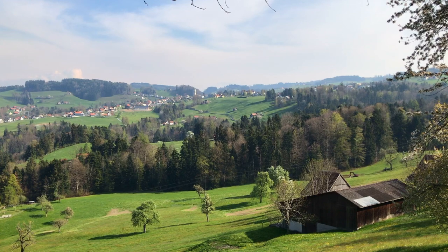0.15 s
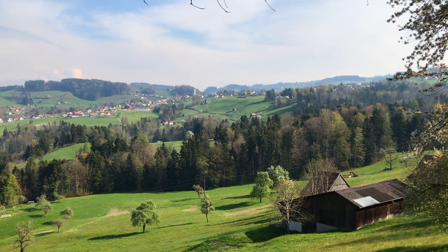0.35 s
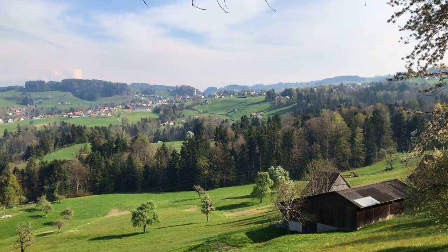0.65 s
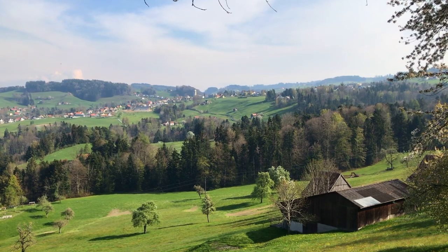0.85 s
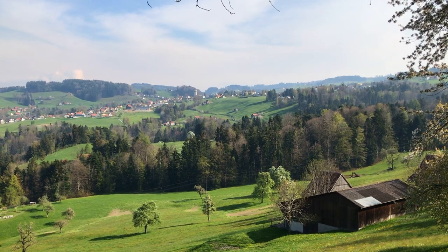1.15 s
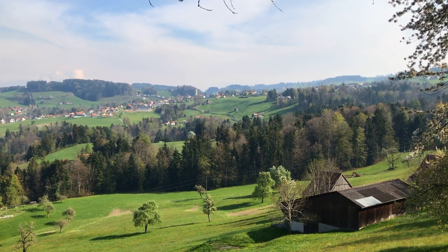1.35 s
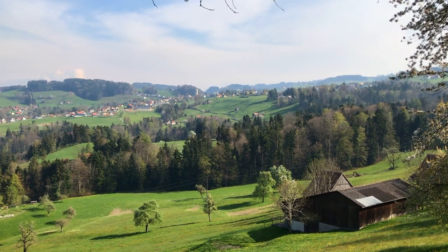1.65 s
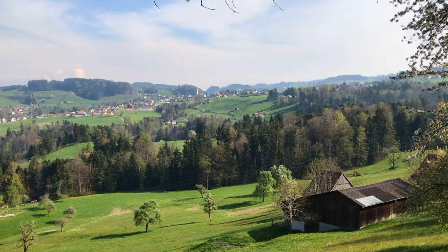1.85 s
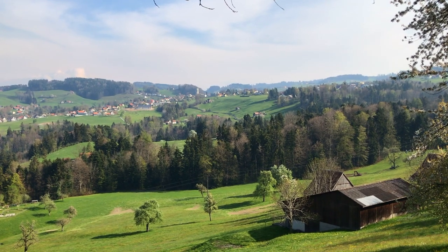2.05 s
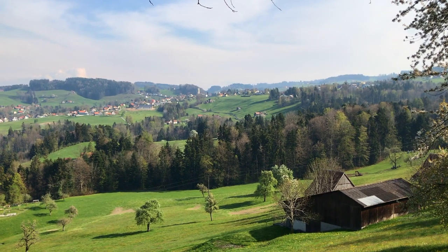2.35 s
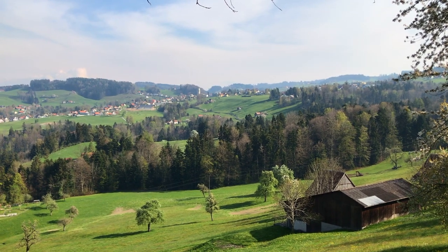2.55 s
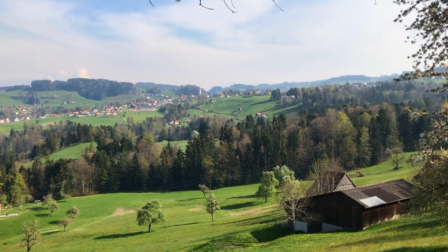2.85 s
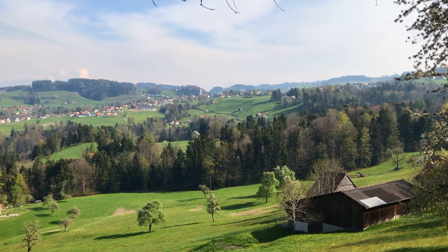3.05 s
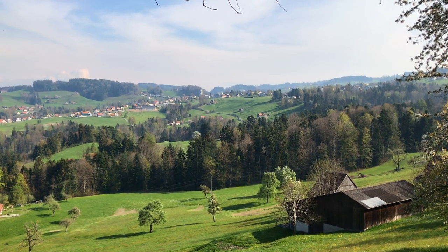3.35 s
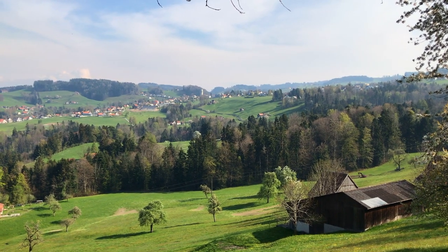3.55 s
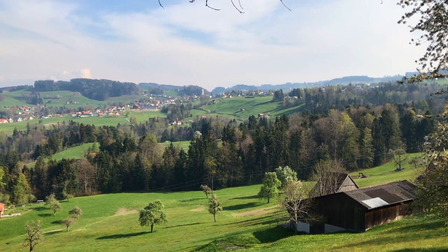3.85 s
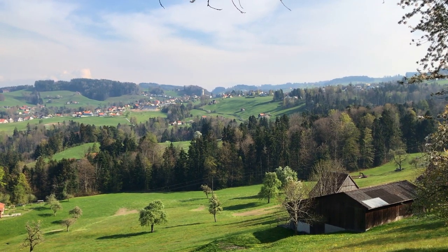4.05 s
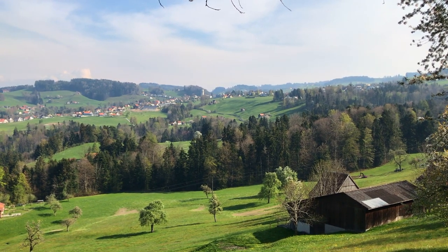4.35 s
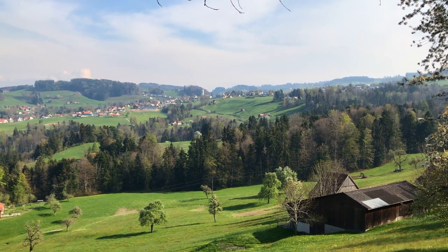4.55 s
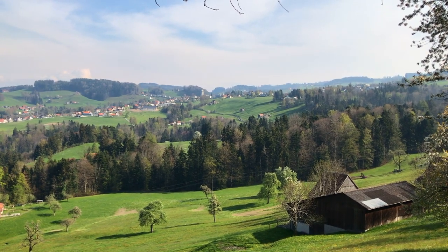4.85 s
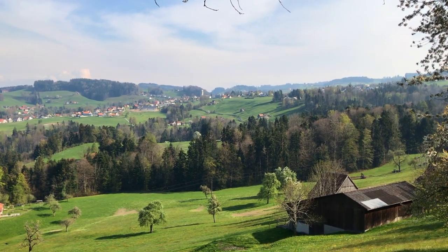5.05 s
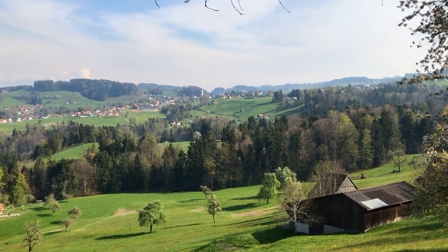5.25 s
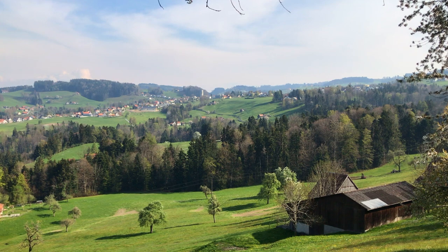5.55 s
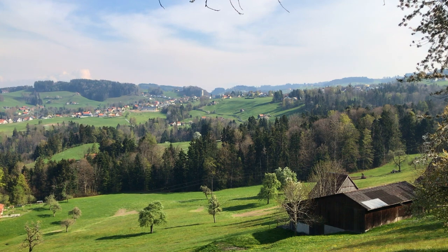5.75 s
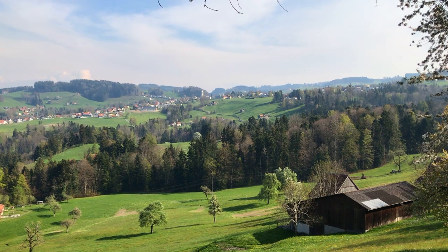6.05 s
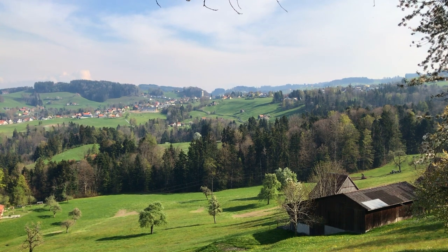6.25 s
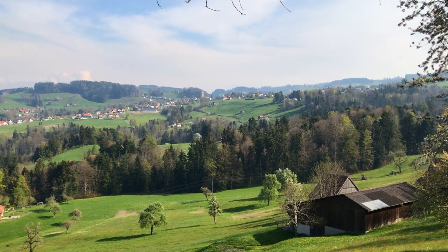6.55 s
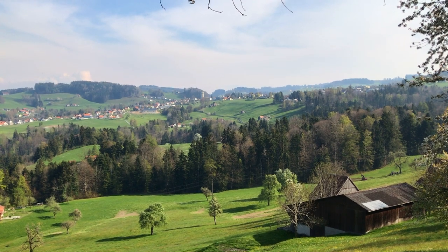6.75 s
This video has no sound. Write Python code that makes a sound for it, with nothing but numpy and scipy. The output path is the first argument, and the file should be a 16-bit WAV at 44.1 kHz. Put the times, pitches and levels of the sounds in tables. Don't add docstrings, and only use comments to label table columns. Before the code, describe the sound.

Small birds whistle, chirp and warble at a wood's edge over a low distant road hum and soft leaf hiss, fading in from near silence.

```python
import sys
import numpy as np
from scipy import signal
from scipy.io import wavfile
from scipy.ndimage import uniform_filter1d

SR = 44100
rng = np.random.default_rng(int(sys.argv[2]) if len(sys.argv) > 2 else 0)


def wrap_up_sound(samples):
    columns = np.atleast_2d(samples).T
    tamed = np.clip(columns, -1, 1)
    steps = np.round(tamed * 32767).astype(np.int16)
    wavfile.write(sys.argv[1], SR, steps)


def volts(x):
    e = np.asarray(x, float) / 20
    return 10 ** e


N = 304731


def evened(x):
    return x / np.sqrt(np.mean(x ** 2) + 1e-20)


def add(mix, s, sound):
    part = mix[round(s * SR):][:len(sound)]
    part += sound[:len(part)]


def wobble(length, hz):
    rough = uniform_filter1d(rng.standard_normal(length), int(SR / hz / 2))
    return evened(uniform_filter1d(rough, int(SR / hz / 3)))


def resonate(x, hz, width):
    turn = np.exp(2j * np.pi * hz * np.arange(len(x)) / SR)
    r = np.exp(-np.pi * width / SR)
    return (turn * signal.lfilter([1], np.convolve([1, -r], [1, -r]), x / turn)).real


def woods(x, gap_s, t60):
    at = np.arange(0, SR - 20, 20) + rng.integers(0, 20, (SR - 1) // 20)
    taps = np.zeros(SR)
    taps[at] = rng.choice([-1., 1.], len(at)) * volts(-60 * at / SR / t60) * (at > gap_s * SR)
    return signal.oaconvolve(x, taps[:int(t60 * SR)] / np.linalg.norm(taps))[:N]


def among_trees(voice, direct_db, *echoes):
    placed = volts(direct_db) * voice
    for db, gap_s, t60 in echoes:
        placed += volts(db) * woods(voice, gap_s, t60)
    return placed


def sing(notes, jitter, flutter_db, edge_s, overtones_db=(), trill_hz=0, trill=0):
    out = np.zeros(N)
    for rows in notes:
        s, hz, db = np.transpose(rows)
        t = np.arange(s[0] - edge_s / 2, s[-1] + edge_s / 2, 1 / SR)
        beat = 2 * np.pi * (trill_hz * t + rng.random())
        grow = np.linspace(.05, 1.4, len(t))
        pitch = uniform_filter1d(np.interp(t, s, hz), size=100, mode="nearest")
        pitch = pitch * (1 + jitter * wobble(len(t), 120.) + trill * grow * np.sin(beat))
        turn = 2 * np.pi * np.cumsum(pitch) / SR
        tone = np.sin(turn)
        for k, overtone_db in enumerate(overtones_db, 2):
            tone += volts(overtone_db) * np.sin(k * turn) * (k * pitch < SR / 2)
        edges = np.sin(np.pi / 2 * np.clip(np.minimum(t - t[0], t[-1] - t) / edge_s, 0, 1)) ** 2
        swing_db = .7 * wobble(len(t), 60.) + .9 * wobble(len(t), 130.)
        swing_db = flutter_db * (swing_db + (trill > 0) * grow * np.cos(beat))
        add(out, t[0], np.sqrt(2) * volts(np.interp(t, s, db) + swing_db) * tone * edges)
    return out


HELD = dict(bend=.3, loud_at=.29, rise_db=-1.5, fall_db=-4.5, ease=1.3)
GLIDE = dict(bend=.39, loud_at=.45, rise_db=-10.5, fall_db=-8.5, ease=1)
SWELL = dict(bend=-1.46, loud_at=.9, rise_db=-9, fall_db=2, ease=1.1)
PING = dict(bend=.27, loud_at=.047, rise_db=-2, fall_db=-31, ease=.67)
HOOK = dict(bend=4.2, loud_at=.34, rise_db=-9.5, fall_db=-12, ease=1)
DIVE = dict(bend=.92, knee=.6, loud_at=.27, rise_db=-2, fall_db=-14, ease=1.3)
ARCH = dict(top_at=.535, flat=.75, start=.021, loud_at=.3, rise_db=-9, fall_db=-3, ease=1)
FLICK = dict(top_at=.296, flat=.77, start=.251, loud_at=.63, rise_db=-1, fall_db=-4, ease=1.1)


def shaped(rows, loud_at, rise_db, fall_db, ease, bend=None, knee=1, top_at=None, flat=None, start=None):
    u = np.linspace(0, 1, num=25)
    if bend:
        path = np.expm1(-bend * np.minimum(u / knee, 1)) / np.expm1(-bend)
    else:
        path = np.sin(np.pi / 2 * np.interp(u, [0, top_at, 1], [start, 1, 0])) ** flat
    level = np.interp(u, [0, loud_at], [rise_db, 0])
    level = level + fall_db * np.clip((u - loud_at) / (1 - loud_at), 0, 1) ** ease
    return [np.array([s + length * u, a + (b - a) * path, db + level]).T for s, length, a, b, db in rows]


# (time [s], traffic nearness [dB], breeze in the leaves [dB])
DRIFT = [
    (0, 2, 6),
    (1, 2.5, 1),
    (2, 2, 0.5),
    (2.8, 1, -3.5),
    (3.6, 0.2, -2),
    (4.6, -2, 0.5),
    (5.6, -2, 0),
    (6.91, -1.5, 0),
]


def wash(spectrum, level_db, column, follow, patchy_db):
    size = 2048
    frames, hz = N // (size // 4) + 5, np.fft.rfftfreq(size, 1 / SR)
    a, b, patches = rng.standard_normal((frames, len(hz), 3)).T
    patches = evened(uniform_filter1d(uniform_filter1d(patches, size=16, axis=0), size=8, axis=1))
    f, db = np.transpose(spectrum)
    shape_db = np.interp(np.log(hz + 1), np.log(f + 1), db, left=-90, right=-90)
    z = (a + 1j * b) * volts(shape_db[:, None] + patchy_db * patches)
    x = evened(signal.istft(z, nperseg=size, noverlap=size * 3 // 4)[1][:N])
    rows = np.transpose(DRIFT)
    return x * volts(level_db + follow * np.interp(np.arange(N) / SR, rows[0], rows[column]))


# (frequency [Hz], level [dB per Hz])
RUMBLE_SPECTRUM = [(14, -40), (24, 3), (39, 2.5), (59, 0.5), (102, -6.5), (156, -11), (188, -13.5),
                   (247, -30), (316, -19), (400, -21.5), (520, -33), (880, -120)]
# (frequency [Hz], level [dB per Hz])
ROAD_SPECTRUM = [(88, -48), (150, -3.5), (275, -0.5), (415, -12), (569, -8.5), (680, -9), (907, -5),
                 (1070, -4), (1880, -14.5), (2250, -14.5), (4000, -28), (5200, -53), (8800, -120)]


def far_road():
    rumble = wash(RUMBLE_SPECTRUM, -50, column=1, follow=-.65, patchy_db=1.36)
    return rumble + wash(ROAD_SPECTRUM, -54.5, column=1, follow=1, patchy_db=.72)


# (frequency [Hz], level [dB per Hz])
LEAF_SPECTRUM = [(1470, -30), (2500, -5.5), (2780, -7.5), (3480, -5.5), (4020, -8), (4650, -10),
                 (5060, -11), (7590, -18.5), (12800, -24), (15600, -21.5)]


def leaves():
    return wash(LEAF_SPECTRUM, -64, column=2, follow=.8, patchy_db=1.5)


def far_chorus():
    start_s = 2.9
    when, hz, glide, length, size = rng.random((120, 5)).T
    s = start_s + when * (N / SR - start_s)
    hz, length = 1700 * 2.3 ** hz, .0145 + .0403 * length
    level = -75 + 6 * size
    notes = np.array([[s, hz, level], [s + length, hz * (.75 + .45 * glide), level + 4.5]])
    far = sing(notes.transpose(2, 0, 1), jitter=.0072, flutter_db=3.5, edge_s=.014)
    return among_trees(far, -6, (0, .005, .4))


def wing_strokes(chirps, pattern_db):
    strokes = [(s + k * .0465, db + step) for s, db in chirps for k, step in enumerate(pattern_db)]
    return [(s, db) for s, db in strokes if s < N / SR]


def stridulate(strokes, sag):
    out, t = np.zeros(N), np.arange(0, .033, 1 / SR)
    catch = 1 - .7 * np.exp(-((t - .019) / .0022) ** 2)
    shape = catch * volts(-200 * t) * signal.windows.tukey(len(t), .25)
    for s, db in strokes:
        pitch = 4885 + 18 * min(db + 55, 0) - sag * t + 30 * wobble(len(t), 200.)
        turn = 2 * np.pi * np.cumsum(pitch) / SR
        tone = np.sin(turn) + volts(-22) * np.sin(2 * turn) + volts(-22) * np.sin(3 * turn)
        add(out, s - .003, np.sqrt(2) * volts(db + 1.4 * wobble(len(t), 150.)) * tone * shape)
    return out


# (time [s], loudest level [dB])
FAR_CRICKET = [
    (2.36, -60.5),
    (3.122, -62),
    (4.25, -59.5),
    (4.762, -58),
    (5.772, -56.5),
    (6.31, -57.5),
    (6.785, -56),
]
NEAR_CRICKET = [
    (.108, -50),
    (1.315, -55.5),
]
FAR_STROKES_DB = [-4.5, -1, 1, -3.5]
NEAR_STROKES_DB = [-12, -5.5, -1, 1]


def crickets():
    far = stridulate(wing_strokes(FAR_CRICKET, FAR_STROKES_DB), 1500)
    near = stridulate(wing_strokes(NEAR_CRICKET, NEAR_STROKES_DB), 5000)
    return among_trees(far, -1.5, (-6, .012, .3)) + among_trees(near, 0, (-18, .01, .25))


# (time [s], peak level [dB], pitch [Hz])
TICKS = [(2.18, -39, 1230), (2.375, -36.5, 1180), (2.552, -37, 1110), (2.719, -43.5, 945),
         (3.618, -36.5, 1160), (3.68, -41.5, 1180), (4.072, -46, 520), (4.241, -45, 1300)]


def ticks():
    out = np.zeros(N)
    for s, db, hz in TICKS:
        cycles = np.arange(0, 3.3, hz / SR)
        add(out, s, volts(db) * np.sin(2 * np.pi * cycles) * abs(np.sin(np.pi * cycles / cycles[-1])) ** 2.3)
    return out


# (time [s], length [s], first pitch [Hz], last pitch [Hz], loudest level [dB])
HIDDEN_DIVES = [
    (5.055, 0.072, 3460, 2680, -43),
    (5.412, 0.073, 3250, 2717, -45),
    (6.798, .085, 3370, 2800, -41.5),
]
HIDDEN_GLIDES = [
    (1.03, .02, 3760, 2880, -54),
    (1.802, 0.024, 3300, 2570, -46.5),
    (5.715, .08, 3050, 2750, -48),
    (6.785, 0.0152, 4000, 3300, -51),
]
HIDDEN_SWELLS = [
    (1.773, 0.02, 2600, 3230, -52),
    (1.838, 0.013, 2700, 3400, -56),
    (5.43, 0.031, 3150, 3200, -52),
]
FAINT_SLURS = [(3.93, 0.133, 2720, 2620, -64), (4.043, .018, 6900, 3400, -64), (3.99, .05, 4000, 3950, -64),
               (4.18, .025, 6400, 7000, -70), (4.235, .04, 3500, 3300, -65), (4.43, .035, 3600, 4000, -67),
               (4.465, .035, 4000, 3650, -68), (4.1, .1, 2000, 1950, -67), (4.8, .016, 4900, 4700, -58),
               (4.9, .016, 4300, 4450, -58), (5.282, .01, 4900, 3700, -58), (5.68, .008, 9000, 3800, -68),
               (4.6, .06, 5000, 4650, -59), (1.33, .05, 3150, 3200, -62)]
# (time [s], pitch [Hz], level [dB])
HIDDEN_STROKES = [
    [(5.84, 4450, -54), (5.852, 3700, -44), (5.862, 3380, -41), (5.868, 2750, -48)],
]


def hidden_birds():
    notes = shaped(HIDDEN_DIVES, **DIVE) + shaped(HIDDEN_GLIDES, **GLIDE)
    notes += shaped(HIDDEN_SWELLS, **SWELL) + shaped(FAINT_SLURS, **HELD) + HIDDEN_STROKES
    voice = sing(notes, jitter=.01, flutter_db=2.5, edge_s=.007)
    return among_trees(voice, -2, (-3, .012, .2), (-15, .03, .5))


def rasps(rows, fizz_db):
    out = np.zeros(N)
    for s, length, db, hz, width in rows:
        t = np.arange(0, length, 1 / SR)
        puffs = rng.standard_normal(len(t)) * volts(1.4 * wobble(len(t), 140.))
        second, third = (evened(resonate(puffs, min(k * hz, 14500), k * width)) for k in (2, 3))
        fizz = second + volts(-3) * third + volts(-8) * evened(np.diff(puffs, prepend=0))
        throat = evened(resonate(puffs, hz, width))
        swell = abs(np.sin(np.pi * t / length)) ** .45
        add(out, s, volts(db) * (throat + volts(fizz_db) * evened(fizz)) * swell)
    return out


# (time [s], length [s], first pitch [Hz], last pitch [Hz], loudest level [dB])
CHIRP_HELD = [
    (3.12, 0.047, 3240, 2600, -53.5),
    (3.626, .012, 6200, 3200, -58),
    (3.635, .02, 6200, 5470, -59),
    (6.608, .05, 5800, 3150, -47),
    (4.155, .019, 7000, 3300, -60.5),
    (4.305, .018, 5900, 3500, -68),
    (6.655, 0.04, 3150, 3000, -44.5),
    (3.99, 0.0137, 5840, 4670, -46),
    (4.4, .016, 6900, 3500, -74),
]
CHIRP_SWELLS = [
    (6.6, 0.0072, 4600, 6000, -50),
    (4.5, .017, 4800, 5900, -68),
    (4.06, .035, 3400, 3800, -68),
]
CHIRP_HOOKS = [
    (3.765, 0.051, 5530, 4770, -50.5),
]
# (time [s], length [s], foot pitch [Hz], top pitch [Hz], loudest level [dB])
CHIRP_FLICKS = [
    (3.616, 0.022, 3150, 6270, -58),
    (4.29, .032, 3700, 7100, -71),
]
# (time [s], pitch [Hz], level [dB])
SPARROW_STROKES = [
    [(1.865, 6750, -54), (1.874, 5230, -41), (1.88, 4400, -47)],
    [(1.947, 5000, -49), (1.962, 5080, -46), (1.974, 5230, -46), (1.985, 5900, -50.5), (2.0, 6100, -57)],
    [(1.956, 3600, -64), (1.972, 4200, -53), (2.004, 4300, -46), (2.012, 4040, -45), (2.021, 3200, -50)],
    [(5.331, 4950, -51), (5.343, 5010, -47), (5.349, 4350, -42), (5.356, 3650, -49)],
    [(4.537, 3600, -59), (4.546, 4800, -54), (4.553, 5750, -50), (4.559, 5350, -49), (4.578, 5450, -52)],
    [(4.556, 5400, -54), (4.564, 4900, -52), (4.582, 4450, -57), (4.61, 3900, -60), (4.625, 3870, -65)],
    [(6.082, 4060, -56), (6.095, 4190, -53), (6.11, 4160, -54), (6.118, 3940, -54), (6.126, 4180, -54),
     (6.15, 4140, -60)],
    [(1.487, 4590, -51), (1.494, 4003, -54), (1.5, 3700, -58)],
    [(4.716, 4920, -59), (4.721, 3600, -51), (4.732, 3500, -53), (4.75, 3490, -62)],
]
# (time [s], length [s], level [dB], centre [Hz], width [Hz])
BRIGHT_RASPS = [
    (1.956, .069, -57, 4370, 900),
    (2.992, .034, -69, 3800, 2500),
    (6.605, 0.038, -55.5, 4800, 1200),
]
DULL_RASPS = [
    (3.63, 0.045, -56, 7200, 3000),
    (3.978, 0.045, -58.5, 6500, 5000),
    (4.546, 0.062, -52, 4930, 1800),
    (4.943, 0.044, -62.5, 5400, 1600),
    (5.335, .06, -52, 4600, 1000),
]
BURRS = [(.078, .025, -52.5, 4200, 1700), (1.317, 0.065, -56.5, 2840, 450), (1.483, 0.045, -57, 3560, 800),
         (1.505, .05, -57, 3950, 350), (2.255, .04, -56, 3150, 600), (6.8, .05, -51, 3200, 500),
         (3.108, 0.043, -63, 3600, 1800), (4.855, 0.04, -53, 3750, 700), (5.157, .048, -49.5, 3930, 470),
         (2.24, .03, -58, 3600, 1200), (4.56, 0.056, -61, 7400, 2700), (5.771, 0.047, -53, 2880, 500),
         (5.8, 0.026, -52, 3270, 600), (1.97, .05, -52, 4200, 600), (6.608, 0.04, -48, 5350, 800),
         (3.99, 0.036, -58, 5650, 900)]


def sparrows():
    notes = shaped(CHIRP_HELD, **HELD) + shaped(CHIRP_SWELLS, **SWELL)
    notes += shaped(CHIRP_HOOKS, **HOOK) + shaped(CHIRP_FLICKS, **FLICK)
    voice = sing(notes, jitter=.018, flutter_db=2.5, edge_s=.006, overtones_db=[-30, -30])
    voice += sing(SPARROW_STROKES, jitter=.0078, flutter_db=1.5, edge_s=.005, overtones_db=[-29, -25])
    voice += rasps(BRIGHT_RASPS, -9) + rasps(DULL_RASPS, -15.5) + rasps(BURRS, -30)
    return among_trees(voice, 0, (-.5, .006, .19), (-11, .03, .5))


# (time [s], length [s], foot pitch [Hz], top pitch [Hz], loudest level [dB])
WARBLE_ARCHES = [
    (4.81, 0.086, 1940, 2173, -54),
    (4.985, 0.08, 1910, 2200, -53.5),
]
# (time [s], length [s], first pitch [Hz], last pitch [Hz], loudest level [dB])
WARBLE_ENDS = [
    (4.533, 0.024, 2106, 2410, -53),
]
# (time [s], pitch [Hz], level [dB])
WARBLE_RISERS = [
    [(5.874, 2590, -55), (5.89, 2345, -48), (5.915, 2335, -46.5), (5.96, 2372, -52.5), (6.1, 2536, -54.5),
     (6.14, 2555, -66)],
    [(6.505, 2690, -59), (6.528, 2430, -53), (6.562, 2403, -49), (6.64, 2474, -52.5), (6.69, 2610, -57),
     (6.725, 2950, -59)],
]


def warbles():
    notes = shaped(WARBLE_ARCHES, **ARCH) + shaped(WARBLE_ENDS, **HELD) + WARBLE_RISERS
    return sing(notes, jitter=.0046, flutter_db=2.5, edge_s=.013, overtones_db=[-36], trill_hz=71.6, trill=.042)


# (time [s], length [s], first pitch [Hz], last pitch [Hz], loudest level [dB])
HELD_LOW = [(.595, .08, 2686, 2590, -56), (.8, 0.08, 2640, 2625, -69), (1.36, 0.042, 2080, 1760, -58.5),
            (2.26, 0.23, 2150, 2376, -67), (2.8, .05, 2210, 2200, -69), (3.09, 0.024, 2790, 2780, -57),
            (3.63, 0.096, 2460, 3120, -64), (4.17, .05, 3100, 3530, -67), (3.94, 0.19, 2280, 1970, -64.5),
            (4.42, 0.13, 2086, 2000, -61), (4.43, 0.014, 2700, 2570, -58), (4.97, 0.052, 2950, 2680, -56.5),
            (5.74, 0.043, 2596, 2570, -57), (5.79, 0.032, 2590, 1930, -49), (6.335, .045, 2350, 2700, -55),
            (6.385, 0.04, 2580, 1856, -50), (6.452, 0.035, 2770, 2664, -42),
            (4.942, 0.026, 3400, 2900, -54), (6.43, 0.022, 3250, 2780, -47), (6.03, 0.064, 1500, 2000, -68),
            (4.682, .025, 2450, 2000, -57)]
HELD_HIGH = [(1.07, 0.22, 3840, 3800, -66.5), (2.09, 0.27, 5100, 5030, -78), (2.24, 0.02, 4630, 2850, -49),
             (3.433, .035, 5549, 4553, -75), (3.939, 0.04, 5800, 5250, -63), (4.331, .03, 3380, 3830, -64),
             (4.937, .03, 5900, 5800, -67), (5.24, .025, 3850, 4500, -51), (5.27, 0.0099, 3720, 4880, -53),
             (5.563, .05, 4650, 4480, -65), (5.556, 0.009, 7050, 4700, -66),
             (5.444, 0.079, 3770, 4035, -54.5), (5.52, 0.01, 4006, 3320, -64),
             (5.989, 0.011, 4800, 4020, -41.5)]
GLIDES = [
    (.09, 0.05, 3070, 2350, -53),
    (1.005, 0.07, 3780, 3790, -54.5),
    (3.67, 0.096, 2290, 2230, -54),
    (6.18, 0.16, 2300, 2030, -60),
]
SWELLS = [
    (1.54, 0.165, 1998, 2040, -59),
    (3.4, 0.087, 2067, 2010, -58),
    (3.78, 0.038, 2155, 1930, -55),
    (3.83, 0.1, 4820, 4720, -68),
    (4.2, .05, 4800, 4780, -66),
    (3.93, .033, 7930, 8030, -61),
    (3.962, .016, 8000, 8850, -59),
]
PINGS = [
    (1.793, 0.06, 3303, 3400, -38.5),
    (2.025, 0.044, 2690, 2540, -52),
    (2.266, 0.071, 3430, 3440, -46),
    (3.0, 0.14, 2420, 2370, -61),
    (5.698, 0.079, 4090, 4190, -44),
]
HOOKS = [
    (3.43, 0.095, 2810, 2320, -54),
]


def whistles():
    notes = shaped(HELD_LOW + HELD_HIGH, **HELD) + shaped(GLIDES, **GLIDE) + shaped(SWELLS, **SWELL)
    notes += shaped(PINGS, **PING) + shaped(HOOKS, **HOOK)
    return sing(notes, jitter=.0096, flutter_db=2.5, edge_s=.008, overtones_db=[-46])


# (time [s], pitch [Hz], level [dB])
LEAD_DIVES = [
    [(5.165, 4070, -47), (5.173, 4060, -45), (5.193, 3780, -40), (5.225, 3595, -34), (5.243, 3490, -40),
     (5.259, 3555, -46), (5.273, 3387, -35.5), (5.325, 3404, -57)],
    [(4.86, 3797, -58), (4.882, 3557, -39), (4.898, 3700, -43), (4.908, 3676, -38.5), (4.926, 3611, -43),
     (4.932, 3592, -51), (4.938, 3440, -41), (4.945, 3465, -50)],
    [(5.998, 3950, -38), (6.008, 3795, -38), (6.048, 3551, -38.5), (6.056, 3380, -35), (6.068, 3340, -47),
     (6.082, 3336, -39.5), (6.095, 3300, -52)],
]
LEAD_ARCHES = [
    [(6.33, 2980, -55), (6.336, 3040, -48), (6.346, 3214, -48), (6.37, 3400, -39), (6.404, 3436, -37.5),
     (6.418, 3446, -42), (6.435, 3250, -44)],
    [(2.11, 3150, -62), (2.151, 3090, -55), (2.167, 3090, -59), (2.177, 3190, -48.5), (2.211, 3216, -49),
     (2.217, 3300, -52), (2.24, 3350, -54)],
    [(3.258, 3230, -62), (3.27, 3200, -57), (3.29, 3480, -52), (3.34, 3429, -50), (3.38, 3317, -46),
     (3.4, 3320, -52), (3.42, 3280, -56)],
    [(1.627, 3450, -54), (1.637, 3350, -50), (1.659, 3230, -50), (1.677, 3180, -51), (1.683, 3080, -53),
     (1.691, 3030, -47), (1.75, 3040, -65)],
]
LEAD_LOW = [
    [(5.285, 2415, -67), (5.297, 2396, -56), (5.311, 2198, -56), (5.327, 2157, -60), (5.381, 2153, -62),
     (5.405, 2080, -56), (5.42, 2030, -68)],
    [(5.225, 1950, -71), (5.249, 2016, -63), (5.259, 2140, -59), (5.269, 2414, -61), (5.275, 2426, -69)],
    [(4.128, 2660, -60), (4.148, 2610, -47.5), (4.172, 2540, -61), (4.18, 2410, -46), (4.206, 2475, -60),
     (4.214, 2446, -58), (4.224, 2332, -59), (4.246, 2353, -56), (4.27, 2534, -64)],
]
LEAD_TURNS = [
    [(3.92, 3720, -60), (3.93, 3951, -51.5), (3.956, 3970, -60), (3.962, 4030, -52), (3.976, 4359, -50),
     (3.99, 4289, -62)],
    [(3.818, 4200, -53), (3.829, 3450, -40.5), (3.838, 3210, -41.5), (3.848, 2900, -49), (3.853, 2800, -56)],
]
LEAD_BOWS = [
    [(4.568, 2790, -51), (4.576, 3005, -49.5), (4.634, 3275, -54), (4.64, 3238, -65), (4.648, 3161, -53),
     (4.67, 2896, -51), (4.678, 2582, -62), (4.69, 2460, -60)],
    [(1.113, 2600, -64), (1.128, 2830, -53), (1.152, 2889, -52.5), (1.202, 2841, -55), (1.25, 2760, -57),
     (1.276, 2700, -65)],
]


def nearest_whistler():
    notes = LEAD_DIVES + LEAD_ARCHES + LEAD_LOW + LEAD_TURNS + LEAD_BOWS
    voice = sing(notes, jitter=.0064, flutter_db=1.64, edge_s=.006, overtones_db=[-44, -47, -56])
    return among_trees(volts(-.5) * voice, 0, (-5.5, .005, .2), (-13, .03, .44))


def scene():
    mix = far_road() + leaves() + far_chorus()
    mix += crickets() + ticks()
    mix += hidden_birds() + sparrows()
    mix += among_trees(warbles() + whistles(), .5, (-5.5, .004, .2), (-14, .03, .37))
    mix += nearest_whistler()
    return mix[None]


def top_cut(x):
    return signal.sosfilt(signal.butter(12, 15750, fs=SR, output="sos"), x)


def record(dry):
    dry = signal.sosfilt(signal.butter(12, 15700., fs=SR, output="sos"), dry)
    thin = signal.sosfilt(signal.butter(5, 40., "highpass", fs=SR, output="sos"), dry)
    fade_s = 3.27
    fade = np.minimum(np.arange(N) / SR / fade_s + .0066, 1)
    return top_cut(thin * fade)


dry = scene()
out = record(dry)
wrap_up_sound(out)
```